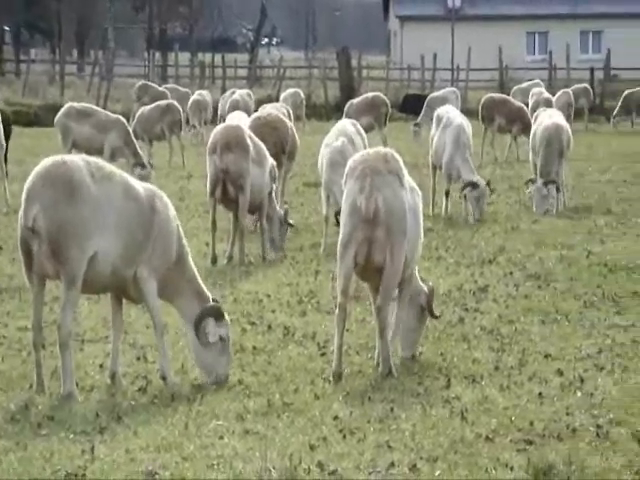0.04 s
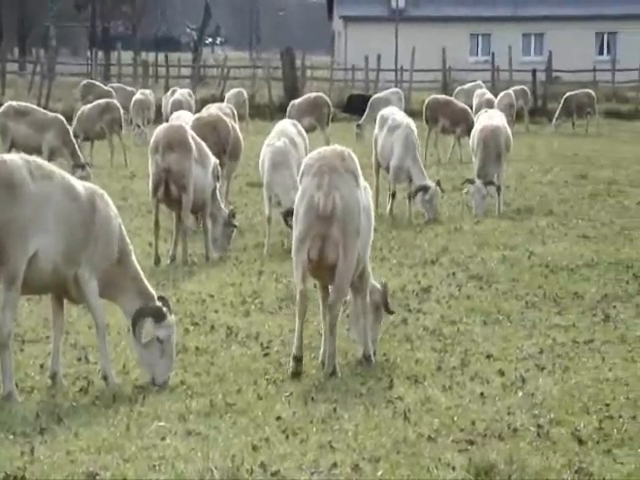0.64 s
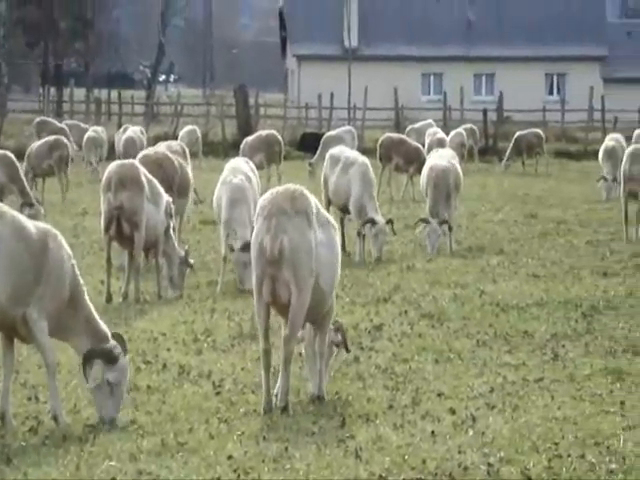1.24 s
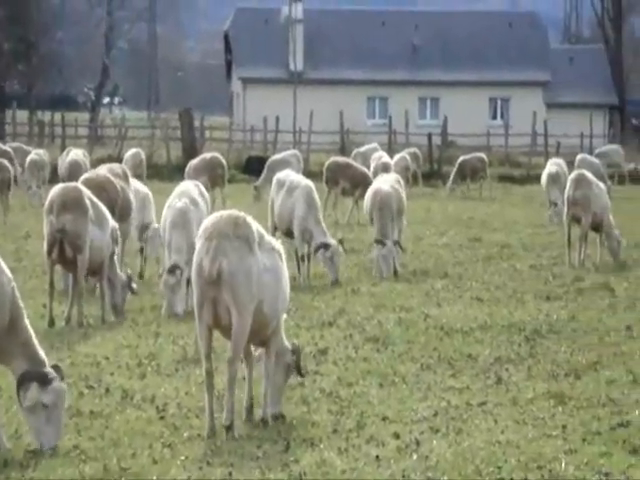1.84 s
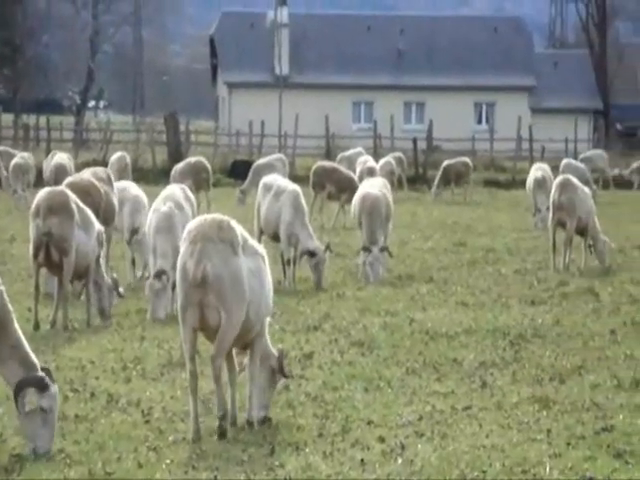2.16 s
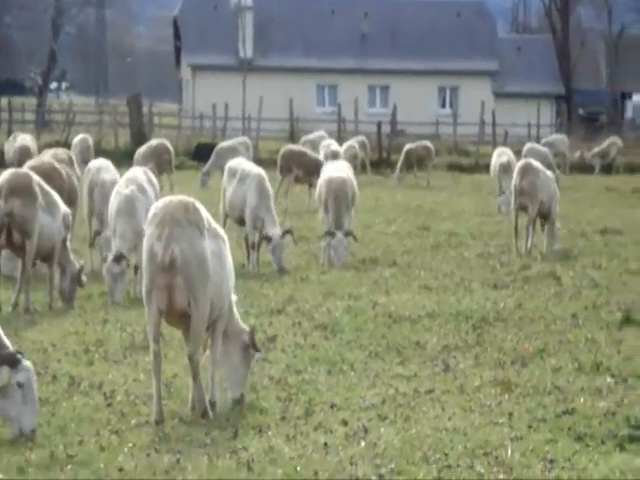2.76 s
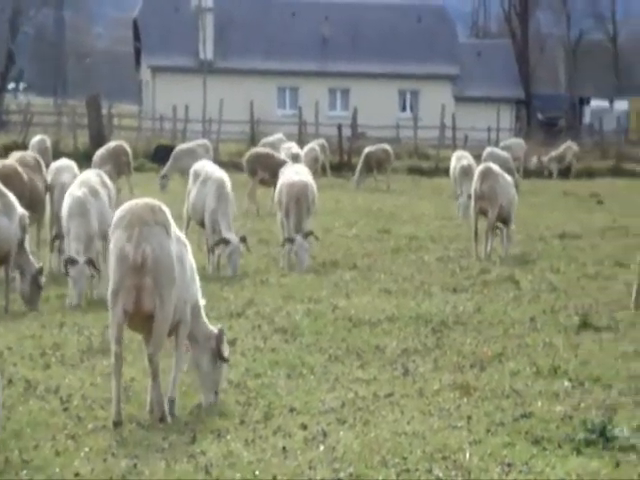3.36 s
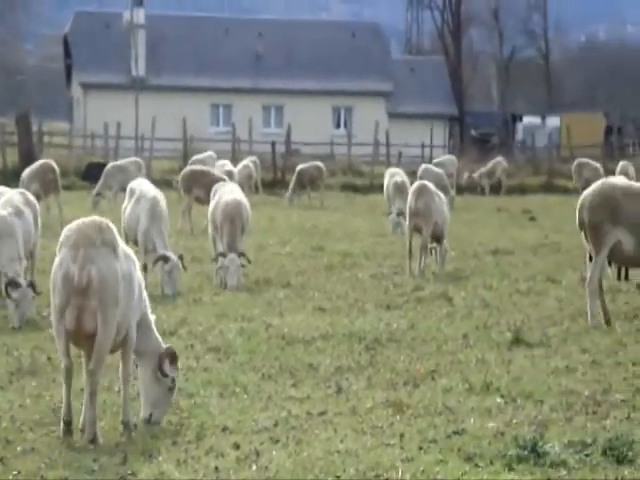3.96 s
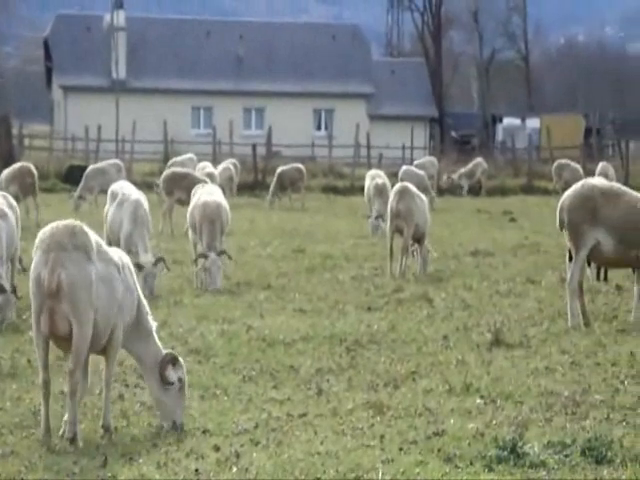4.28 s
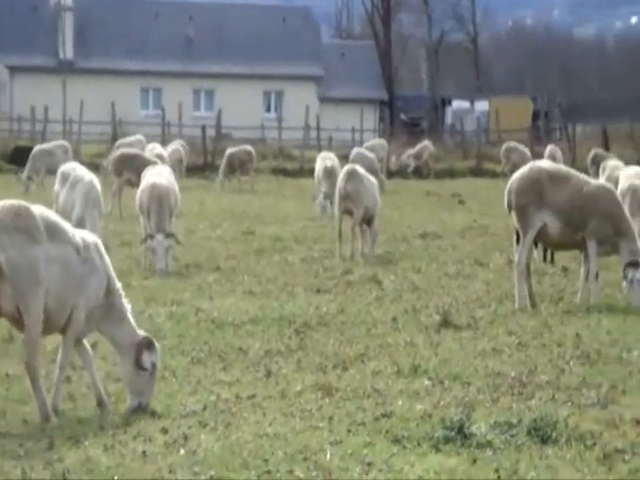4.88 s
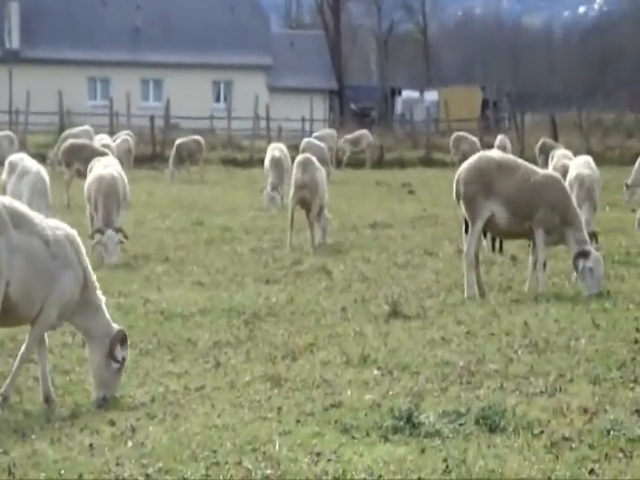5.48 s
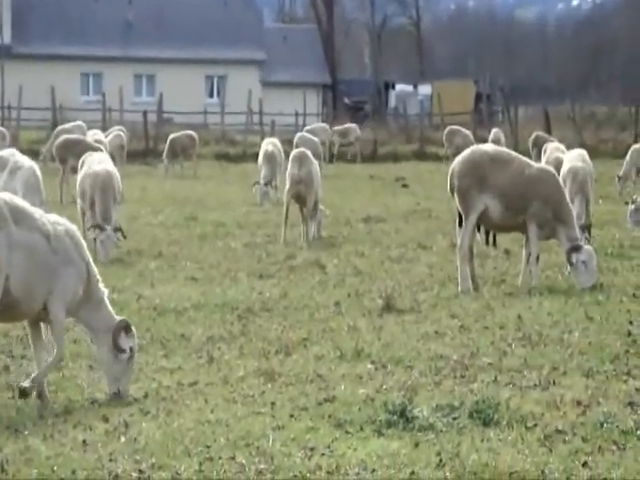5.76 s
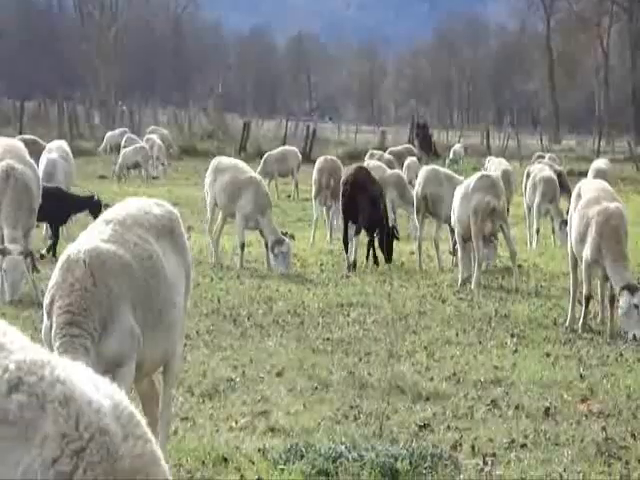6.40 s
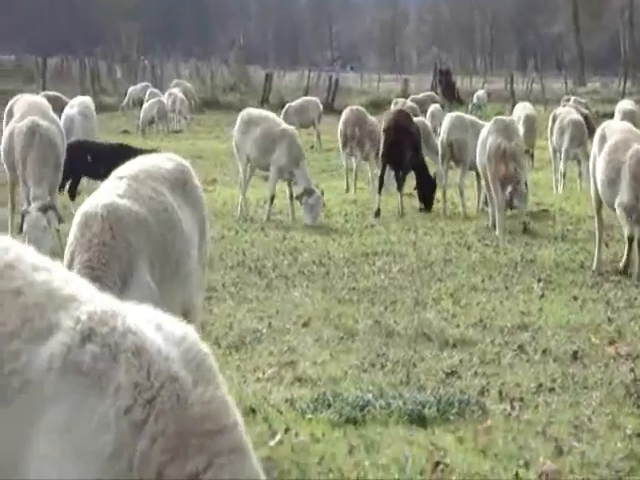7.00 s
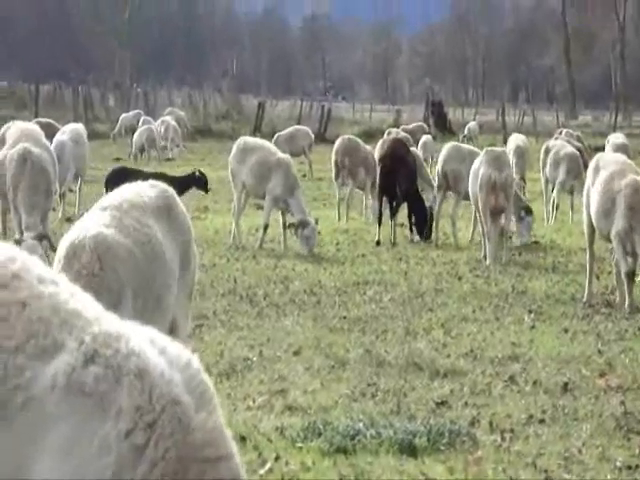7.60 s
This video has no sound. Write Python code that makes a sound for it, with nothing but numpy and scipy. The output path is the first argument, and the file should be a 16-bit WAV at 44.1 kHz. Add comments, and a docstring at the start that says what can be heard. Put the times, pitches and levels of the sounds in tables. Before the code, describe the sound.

A car has just passed and fades away over the first few seconds, leaving soft open air in a pasture. Throughout, three nearby sheep bells give uneven hollow clanks and small bright clinks, while distant bells ping and blades of grass tick faintly. After a sudden change to a quieter position, far bells jingle, the sheep tear mouthfuls of grass and stalks crack, once followed by a brief tinny chirp.

```python
"""Sheep graze in an open field. From the start a passing car recedes, its tyre roar and exhaust drone
fading, while clappers excite the wall and cavity modes of three near sheet-metal bells, which clank and
clink as their wearers tug at the grass. Single blades tick, and other bells answer from farther off.
At 6.45 s the scene changes abruptly to a quieter spot among the flock, without the car. There the bells
go on, grass tears, far bells jingle and stalks snap, one snap followed by a brief tinny chirp."""
import sys
import numpy as np
from scipy import signal
from scipy.io import wavfile
from scipy.ndimage import uniform_filter1d

SR = 44100
rng = np.random.default_rng(int(sys.argv[2]) if len(sys.argv) > 2 else 0)


def digitize_waveform(pressure):
    """Quantize a signal to 16-bit integers and store it at the path in sys.argv[1].

    Rows of a 2-D input are taken as channels; values are limited to [-1, 1].
    """
    field = np.atleast_2d(pressure).T
    bounded = np.clip(field, -1, 1)
    quanta = np.round(bounded * 32767).astype(np.int16)
    wavfile.write(sys.argv[1], SR, quanta)


N = 341334
TIME = np.arange(N) / SR

# modes of the nearest, the deeper and the small bell, the air cavity first and then the wall:
# (frequency [Hz], relative level [dB], t60 [s])
NEAR_MODES = [(597, 0, 0.2), (1276, 0, 0.9), (1873, -7, 0.45), (2083, -4, 0.22), (2412, 0, 0.85),
              (2896, 0, 0.88), (3144, -7, 0.35), (3289, 0, 0.6), (3402, -3, 0.35), (3822, -5, 0.3),
              (3865, -4, 0.3), (4215, -1, 0.16), (4457, 0, 0.38), (4770, -5, 0.25), (4834, -5, 0.2),
              (5313, -6, 0.48), (5553, -13, 0.2), (5895, 0, 0.16), (6148, -8, 0.2), (6285, -2, 0.2),
              (6401, -3, 0.15), (6495, -5, 0.18), (7095, -4, 0.24), (7149, 0, 0.1), (7811, -14, 0.2),
              (8258, -6, 0.14), (8812, -13, 0.18), (9190, -10, 0.15), (9590, -14, 0.15)]
DEEP_MODES = [(548, 0, 0.24), (1728, 0, 0.5), (2288, -1, 0.4), (2640, 0, 0.3), (2998, -7, 0.5),
              (3187, -5, 0.6), (3805, 0, 0.3), (4231, -1, 0.35), (4630, -4, 0.25), (4834, -8, 0.3),
              (5420, -7, 0.2), (6470, -9, 0.15), (7289, -14, 0.2)]
SMALL_MODES = [(715, 2, 0.2), (1675, 0, 0.15), (3580, -13, 0.13), (4145, -3, 0.08), (4371, -5, 0.13),
               (4587, -7, 0.12), (4845, -2, 0.13), (5087, -18, 0.13), (5553, -12, 0.13), (5690, -15, 0.13),
               (5927, -7, 0.13), (6110, -12, 0.13), (6293, -7, 0.13), (6465, 0, 0.13), (6503, -2, 0.09),
               (6756, -5, 0.11), (6901, -13, 0.12), (7300, -15, 0.11), (7811, -13, 0.13), (8030, -15, 0.1),
               (8258, -2, 0.11), (8550, -11, 0.1), (8812, -10, 0.13), (9080, -11, 0.09), (9475, -11, 0.1),
               (9735, -3, 0.09), (10270, -12, 0.07), (10580, -12, 0.06)]
# clapper blows: (time [s], force [dB], wall against cavity [dB]);
# the nearest bell's also have (softness [dB/octave], place on the rim [0-1])
NEAR_STRIKES = [(0.597, -16, -14, 1.5, 1), (1.102, -23, -9, 17, 0.33), (1.34, -23.5, -12.5, 23, 0.5),
                (1.722, -17.5, -11, 3.5, 0.07), (2.442, -14, -16.5, 1.5, 0.28), (2.825, -24, -20, 5, 0.5),
                (3.2795, -19, -14, 3.5, .3), (3.32, -40.5, 9, 22, .05), (3.562, -25.5, -6.5, 0.5, 0.56),
                (3.59, -31, -5.5, 17, 0.47), (4.064, -19, -14.5, 4, 0.66), (4.183, -34, -1, 5.5, 0),
                (4.293, -20, -13.5, 11, 1), (4.491, -25.5, -6, 10.5, 0.7), (4.817, -31, -12, 4, 0.5),
                (4.9448, -24, -15.5, 4, 1), (5.6237, -21.5, -16, 1.5, 0.8), (5.718, -26, -16.5, 2, 0.26),
                (6.088, -28.5, -18, 16, .36), (6.38, -23.5, -14.5, 3, 0.6), (6.519, -11, -11, 4, 0.38),
                (6.715, -27.5, -7.5, 4.5, 0.72), (6.995, -18, -19, 0.5, 0.3)]
DEEP_STRIKES = [(1.696, -27, -27), (2.112, -23, -16.5), (2.668, -25.5, -16), (3.03, -20, -18.5),
                (3.434, -23, -16), (3.589, -28.5, -15), (3.892, -21, -16.5), (4.183, -27.5, -15),
                (4.207, -30, -14), (4.579, -29, -27), (4.617, -31.5, -25), (5.0053, -20.5, -14.5),
                (5.135, -33, -28), (5.409, -25, -16.5), (5.774, -26.5, -35), (5.975, -21.5, -17.5),
                (6.273, -30.5, -19), (6.347, -32, -27), (6.998, -29.5, -5), (7.551, -25.5, -12)]
SMALL_STRIKES = [(0.375, -33, -7.5), (1.8, -43, 5), (1.935, -42, 1.5), (2.79, -47.5, 3), (3.22, -41.5, 4.5),
                 (4.0423, -48.5, 21), (4.095, -49, 10), (4.828, -39, 4.5), (5.2556, -31, 0),
                 (5.597, -47.5, 3), (5.978, -51, 2), (6.022, -39, 4.5), (6.205, -55.5, 15),
                 (6.669, -47, 12.5), (6.965, -36.5, 0), (7.44, -51, 8.5)]
# coupling of each clapper to its bell's wall: (frequency [Hz], gain [dB])
NEAR_COUPLING = [(1280, -4.5), (1900, -6.5), (2400, -3.5), (2900, 0.5), (3150, -5.5), (3850, -7),
                 (4450, -4), (5400, -0.5), (6300, -5), (9000, -3.5)]
DEEP_COUPLING = [(1730, 0), (2300, -9), (7000, -14.5)]
SMALL_COUPLING = [(1700, -5.5), (4000, 0), (6500, 1), (9000, -0.5)]
# where each group of the nearest bell's modes rings best: (upper frequency [Hz], place on the rim [0-1])
RIM_ANTINODES = [(2200, .3), (2600, 0), (3000, 1), (4000, .45), (5000, .95), (6000, .1), (12000, .5)]
# pings by name: far bells, except "tinny", a brief chirp just after a stalk snap:
# (frequency [Hz], relative level [dB], t60 [s])
PING_PARTIALS = {"clear": [(3087, 0, .65)], "thin": [(4178, 0, .8)], "dull": [(865, 0, .22),
                 (4090, -17, .41)], "long": [(1875, 0, 1)], "hollow": [(1032, 0, .22)],
                 "tinny": [(2470, -2, .05), (2570, 0, .05), (2700, -5, .04)]}
# when each ping sounds: (time [s], ping [name], level [dB])
PINGS = [(0.915, "thin", -40), (1.571, "clear", -40.5), (2.99, "thin", -48), (3.3, "clear", -44),
         (3.64, "dull", -34), (4.205, "dull", -25), (4.48, "dull", -33), (4.491, "clear", -41),
         (5.077, "clear", -46), (5.409, "long", -53), (5.409, "clear", -44.5), (5.53, "clear", -40.5),
         (5.625, "long", -42.5), (5.899, "clear", -42.5), (6.03, "dull", -31.5), (6.892, "thin", -38.5),
         (7.31, "clear", -45), (7.439, "hollow", -34.5), (7.683, "tinny", -31)]
# far bells that jingle at the second spot: (frequency [Hz])
JINGLE_PARTIALS = [2998, 3087, 4090, 4180]
# mouthfuls of grass tearing: (time [s], duration [s], level [dB], centre frequency [Hz])
GRASS_TEARS = [(6.723, 0.051, -47, 9000), (6.777, 0.14, -41.5, 8200), (7.117, 0.048, -47, 7800),
               (7.234, 0.06, -45.5, 6530), (7.297, 0.046, -48.5, 6960), (7.571, 0.045, -47, 7000),
               (7.668, 0.012, -45, 8450)]
# dry snaps, as of stalks: (time [s], peak level [dB], t60 [s])
STALK_SNAPS = [(6.9948, -15.5, 0.087), (7.257, -35, .012), (7.657, -14.5, 0.014), (7.731, -31, 0.0055)]
# resonances of a snap: (frequency [Hz], bandwidth [Hz], relative level [dB])
SNAP_RESONANCES = [(1550, 730, 3.5), (4000, 940, 10), (4900, 450, -2), (9500, 1600, -8)]
# tyre roar when close, drawing off and distant: (frequency [Hz], relative spectral density [dB])
CLOSE_SPECTRUM = [(24, -68), (40, -55), (60, -32), (164, -17), (198, -17.5), (382, -11.5), (419, -17.5),
                  (531, -8), (773, -4.5), (933, 2.5), (1420, -13), (3170, -22.5), (6560, -37.5),
                  (9330, -44.5), (11000, -60), (14300, -83), (22000, -120)]
LEAVING_SPECTRUM = [(24, -61), (40, -61), (95, -28), (184, -11.5), (256, -7), (391, -18), (583, -7),
                    (755, -13.5), (1000, -1), (1640, -6), (2170, -16.5), (2950, -17.5), (3730, -23.5),
                    (6870, -30), (11000, -42.5), (14300, -87), (22000, -120)]
DISTANT_SPECTRUM = [(40, -39), (66, -16.5), (85, -19.5), (140, -9), (220, -3.5), (310, -7.5), (410, -10.5),
                    (600, -7.5), (850, -1.5), (1150, 1), (1600, -4), (2200, -10.5), (4000, -22.5),
                    (11000, -47)]
# when each of those three spectra holds: (time [s])
ROAR_TIMES = [0.21, 1.16, 2.65]
# exhaust tones: (frequency [Hz], level relative to CAR_DB [dB])
EXHAUST_TONES = [(66, -35), (193, -27)]
# the air over the field: (frequency [Hz], relative spectral density [dB])
AIR_SPECTRUM = [(24, -60), (40, -22), (176, -10), (288, -10), (373, -3), (419, -9), (569, 7), (671, -7),
                (1000, -2), (2750, -11), (4200, -13), (8900, -15.5), (11000, -21), (14300, -115),
                (22000, -120)]

SCENE_CHANGE_S, JINGLE_FROM_S = 6.45, 7.05
WALL_RISE_S, SOFT_ABOVE_HZ = 0.00035, 2900
KNOCK_SHORTENING = 1.11  # shortens the cavity's hollow knock, so that it stays brief under the chatter
BOUNCE_DB, CHATTER_DB, CHATTER_GAP_S = -7.5, -13, (0.0168, 0.02136)
# the car is nearest at PASS_S and covers that distance again every CROSS_S; CAR_DB is its base gain
PASS_S, CROSS_S, CAR_DB = 0.05, 0.88, -18.5
SCREEN_DB, SCREEN_S, SCREEN_WIDTH_S = 10, 1.534, 0.29  # loss behind the land: depth, midpoint, spread


def bell(modes, coupling, strikes, swell_s, sag, tick_db, spread_db):
    """Modal superposition: a blow rings the wall at once; the cavity swells and settles onto its pitch."""
    hz, db, t60 = np.transpose(modes)
    coupling_hz, coupling_db = np.transpose(coupling)
    t = np.arange(SR) / SR
    drive = gain_of(np.interp(np.log(hz), np.log(coupling_hz), coupling_db))
    envelopes = gain_of(db)[:, None] * decay(t, t60[:, None]) * (1 - np.exp(-t / WALL_RISE_S))
    rings = envelopes * np.sin(2 * np.pi * hz[:, None] * t)
    swell = gain_of(db[0]) * decay(t, t60[0] / KNOCK_SHORTENING) * (1 - np.exp(-t / swell_s))
    early, late = np.zeros((2, N))
    for s, force_db, wall_db, *manner in strikes:
        weights = gain_of(force_db + wall_db) * drive * excitation(hz, *manner)
        # no two blows land on the same spot, which the high modes feel most
        spot = gain_of(spread_db * hz / 6000 * rng.standard_normal(len(hz)))
        spot *= rng.choice([-1, 1], len(hz))
        wall = (weights * spot)[1:] @ rings[1:]
        cavity_hz = hz[0] * (1 - sag * rng.uniform(0.48, 2.14) * np.exp(-t / 0.013))
        cavity = gain_of(force_db) * swell * oscillator(cavity_hz)
        # the contact is a short tick that scales with the drive of the highest mode
        tick = gain_of(tick_db) * weights[-1] * decay(t, t60=0.04) * rng.standard_normal(len(t))
        knock = cavity + resonator(tick, hz=4700, width_hz=5300)
        mix = early if s < SCENE_CHANGE_S else late
        add(mix, s, wall + knock)
        # the clapper bounces, stirring the treble once, then chatters twice, weaker each time
        add(mix, s + rng.uniform(0.0056, 0.019), gain_of(BOUNCE_DB) * bass_cut(wall, hz=5000))
        for k, delay in enumerate(np.cumsum(rng.uniform(*CHATTER_GAP_S, size=2))):
            add(mix, s + delay, gain_of(CHATTER_DB) / (k + 1) * knock)
    return early * before_change() + late


def excitation(hz, softness_db=0, place=None):
    """Impact excitation: a soft blow loses treble, and a mode rings best when struck at its antinode."""
    share = gain_of(-softness_db * np.maximum(np.log2(hz / SOFT_ABOVE_HZ), 0))
    if place is None:
        return share
    upper_hz, antinodes = np.transpose(RIM_ANTINODES)
    return share * np.cos(np.pi / 2 * (place - antinodes[np.searchsorted(upper_hz, hz)]))


def flock(faint_count, faint_db, faint_t60, echo_db):
    """Multipath propagation: echoes blur far bells, a sprinkling of fainter ones and one tinny chirp."""
    out = jingle(count=12, loudest_db=-47.5, t60=0.99)
    for s, name, level_db in PINGS:
        for hz, db, t60 in PING_PARTIALS[name]:
            add(out, s, ping(hz, level_db + db, t60))
    for when, pitch, weakness in rng.random((faint_count, 3)):
        add(out, when * N / SR, ping(1500 + 3300 * pitch, faint_db - 10 * weakness, faint_t60))
    return out + gain_of(echo_db) * echoes(out, t60=0.6)


def jingle(count, loudest_db, t60):
    """Superposition: far bells tapped softly in turn run together, as each decay outlasts the gap."""
    out = np.zeros(N)
    for k, (when, weakness) in enumerate(rng.random((count, 2))):
        s = JINGLE_FROM_S + (k + when) / count * (N / SR - JINGLE_FROM_S)
        hz = JINGLE_PARTIALS[-1 - k % len(JINGLE_PARTIALS)]
        add(out, s, ping(hz, loudest_db - 6 * weakness, t60))
    return out


def ping(hz, db, t60):
    """Damped free vibration: one partial with a blurred attack."""
    t = np.arange(SR) / SR
    return gain_of(db) * decay(t, t60) * (1 - np.exp(-t / .005)) * np.sin(2 * np.pi * hz * t)


def grass(fibres_per_s, width_hz, nibbles_per_s, nibble_db):
    """Fracture noise: single blades tick, a tear is a swarm of breaking fibres, a snap is one crack."""
    t = np.arange(SR // 10) / SR
    blades = (rng.random(N) < nibbles_per_s / SR) * rng.uniform(0.19, 1, N)
    ticks = signal.oaconvolve(blades, decay(t, t60=0.0044))[:N] * rng.standard_normal(N)
    out = gain_of(nibble_db) * resonator(ticks, hz=8000, width_hz=5300)
    for s, length_s, db, hz in GRASS_TEARS:
        n = int(length_s * SR)
        fibres = rng.standard_normal(n) * (0.085 + (rng.random(n) < fibres_per_s / SR))
        tear = resonator(resonator(fibres, hz, width_hz), hz, width_hz)
        add(out, s, gain_of(db) * unit_rms(tear * signal.windows.tukey(n, .5)))
    for s, db, t60 in STALK_SNAPS:
        crack = rng.standard_normal(len(t)) * decay(t, t60)
        snap = sum(gain_of(level) * resonator(crack, hz, width) for hz, width, level in SNAP_RESONANCES)
        add(out, s, gain_of(db) * snap / abs(snap).max())
    return out


def echoes(x, t60):
    """Scattering: the ground, the flock and the farm buildings return short, sparse reflections."""
    t = np.arange(SR // 2) / SR
    taps = rng.standard_normal(len(t)) * (rng.random(len(t)) < 1500 / SR)
    taps *= decay(t, t60) * (t > .004)
    return signal.fftconvolve(x, taps / np.linalg.norm(taps))[:N]


def car(close_db, leaving_db, distant_db, waver):
    """Ground effect: with distance, grass absorbs the tyre roar's lower middle; the exhaust drones on."""
    stages = [(CLOSE_SPECTRUM, close_db), (LEAVING_SPECTRUM, leaving_db), (DISTANT_SPECTRUM, distant_db)]
    out = np.zeros(N)
    for (spectrum, db), share in zip(stages, np.eye(3)):
        crossfade = np.sqrt(np.interp(TIME, ROAR_TIMES, share))
        out += crossfade * gain_of(db) * air_noise(spectrum, patchy_db=1.94)
    for hz, db in EXHAUST_TONES:
        drift = unit_rms(uniform_filter1d(rng.standard_normal(N), size=3000))
        out += gain_of(db) * oscillator(hz * (1 + waver * drift))
    return out * receding() * before_change()


def receding():
    """Spherical spreading: the car's amplitude falls as 1 / distance, and the land screens it."""
    distance = np.hypot(1, (TIME - PASS_S) / CROSS_S)
    screened = 1 / (1 + np.exp((SCREEN_S - TIME) / SCREEN_WIDTH_S))
    return gain_of(CAR_DB - SCREEN_DB * screened) / distance


def air_noise(spectrum, patchy_db):
    """Spectrally shaped noise at rms 1: slow modulation stirs its low end while the hiss stays even."""
    hz = np.fft.rfftfreq(2048, 1 / SR)
    spectrum_hz, spectrum_db = np.transpose(spectrum)
    real, imag, patches = rng.standard_normal((3, N // 512 + 5, len(hz)))
    patches = uniform_filter1d(patches, size=8, axis=0)  # smooth in time
    patches = unit_rms(uniform_filter1d(patches, size=7, axis=1))  # and in frequency
    steady_db = np.interp(np.log(hz + 1), np.log(spectrum_hz), spectrum_db)
    stir_db = patchy_db * patches / (1 + (hz / 2000) ** 2)
    frames = (real + 1j * imag) * gain_of(steady_db + stir_db)
    return unit_rms(signal.istft(frames.T, nperseg=2048, noverlap=1536)[1][:N])


def before_change():
    """A gate: 1 until the scene changes, then 0."""
    return np.clip((SCENE_CHANGE_S - TIME) / .004, 0, 1)


def oscillator(hz):
    """A sine whose phase is the integral of its frequency."""
    return np.sin(2 * np.pi * np.cumsum(hz) / SR)


def resonator(x, hz, width_hz):
    """Second-order resonance."""
    return signal.lfilter(*signal.iirpeak(hz, hz / width_hz, SR), x)


def bass_cut(x, hz):
    """Second-order high-pass."""
    return signal.sosfilt(signal.butter(2, hz, "highpass", fs=SR, output="sos"), x)


def decay(t, t60):
    """Exponential decay, 60 dB down after t60."""
    return np.exp(-np.log(1000) * t / t60)


def gain_of(db):
    """Decibels to amplitude."""
    return 10 ** (np.asarray(db) / 20)


def unit_rms(x):
    """Normalisation to rms 1."""
    return x / np.sqrt(np.mean(x ** 2) + 1e-20)


def add(mix, s, sound):
    """Superposes a sound on the mix at time s."""
    part = mix[max(round(s * SR), 0):][:len(sound)]
    part += sound[:len(part)]


def scene():
    """Linear superposition of bells, grazing and their echoes over the car and the open air."""
    near = bell(NEAR_MODES, NEAR_COUPLING, NEAR_STRIKES,
                swell_s=0.0019, sag=0.019, tick_db=16, spread_db=2.5)
    deep = bell(DEEP_MODES, DEEP_COUPLING, DEEP_STRIKES,
                swell_s=0.0027, sag=0.034, tick_db=18, spread_db=7)
    small = bell(SMALL_MODES, SMALL_COUPLING, SMALL_STRIKES,
                 swell_s=0.0014, sag=-0.035, tick_db=1.5, spread_db=1.5)
    pings = flock(faint_count=60, faint_db=-43.5, faint_t60=0.41, echo_db=-3.5)
    grazing = grass(fibres_per_s=2200, width_hz=8700, nibbles_per_s=12, nibble_db=-35.5)
    # sources this small radiate almost no bass
    sheep = bass_cut(bass_cut(near + deep + small + pings + grazing, hz=335), hz=335)
    field = gain_of(-43) * air_noise(AIR_SPECTRUM, patchy_db=3.5)
    road = car(close_db=1.5, leaving_db=1.5, distant_db=2.5, waver=0.0095)
    return (sheep + gain_of(-17.5) * echoes(sheep, t60=1.0) + field + road)[None]


def record(dry):
    """Band limiting: a gentle bass cut and a steep treble cut."""
    low_pass = signal.firwin(901, cutoff=11150, window=("kaiser", 9), fs=SR)
    return signal.oaconvolve(bass_cut(dry, hz=42), low_pass[None], "same")


dry = scene()
out = record(dry)
digitize_waveform(out)
```